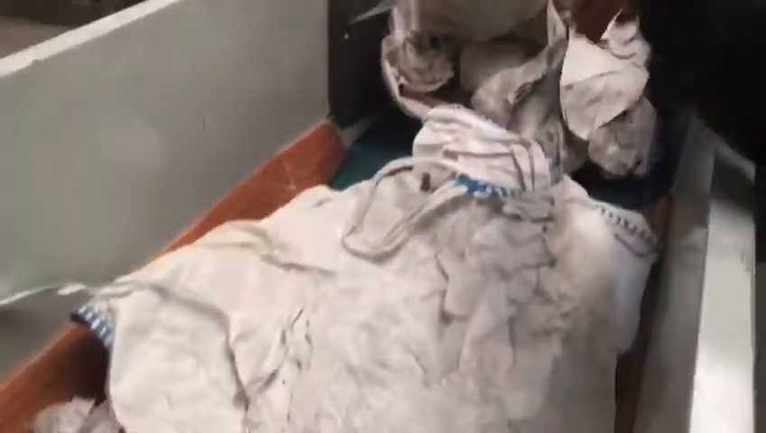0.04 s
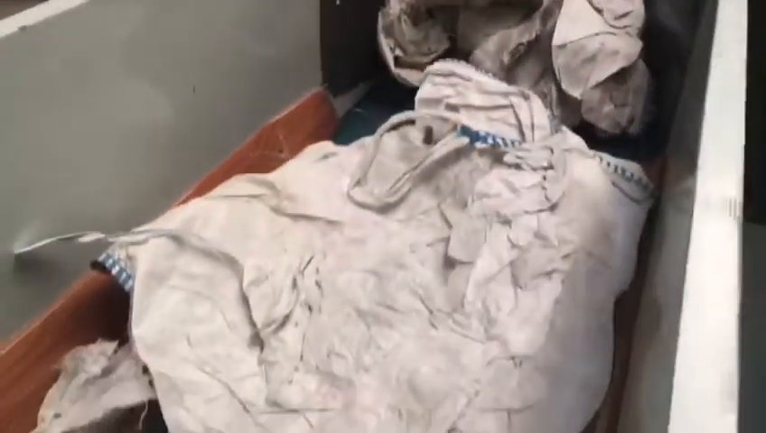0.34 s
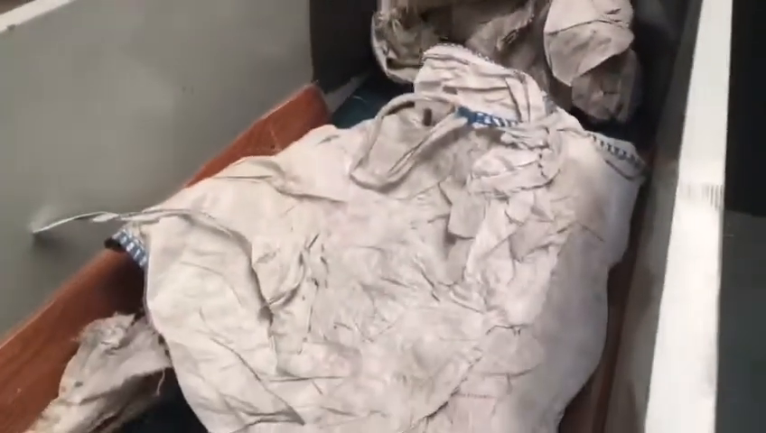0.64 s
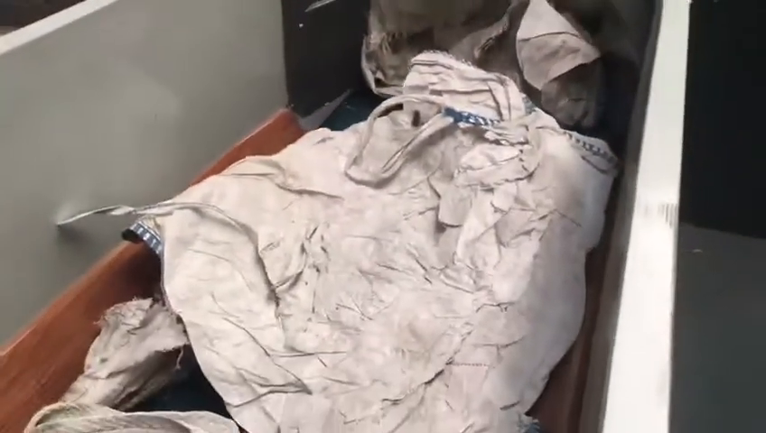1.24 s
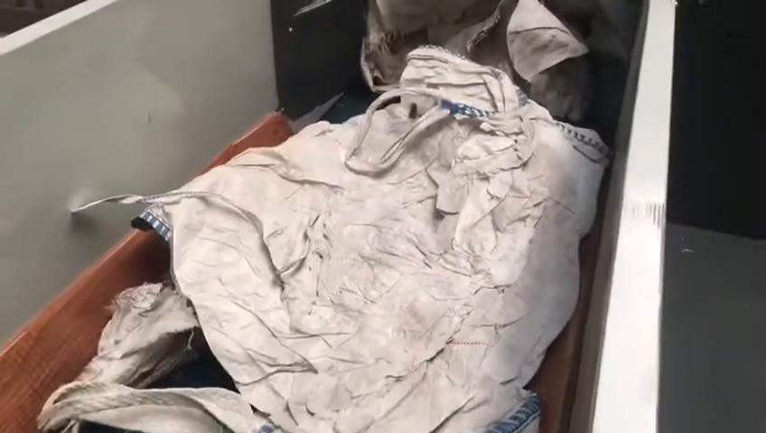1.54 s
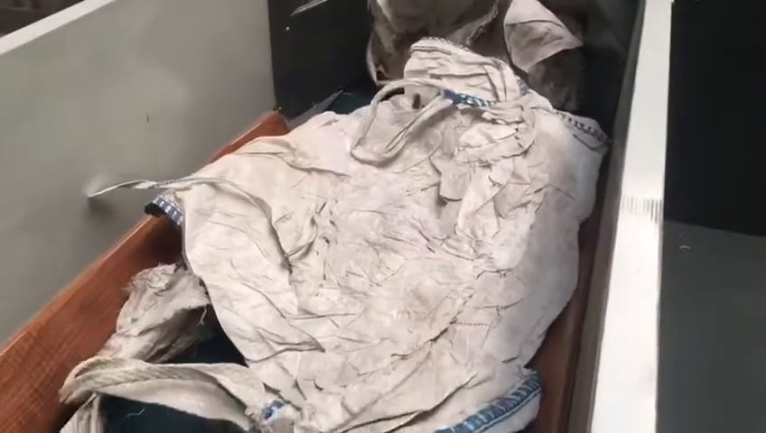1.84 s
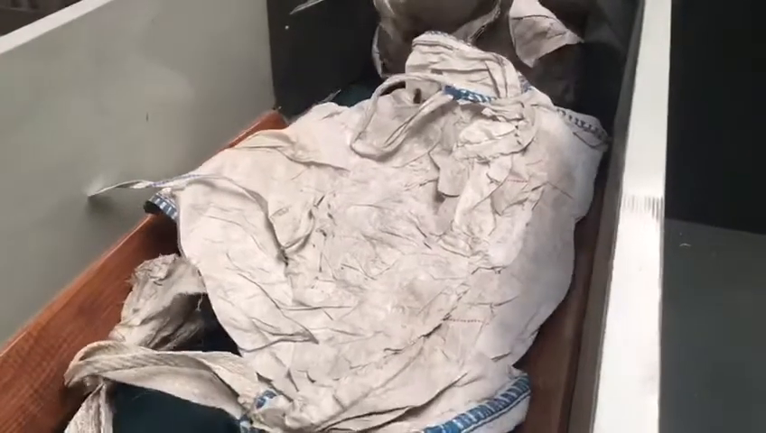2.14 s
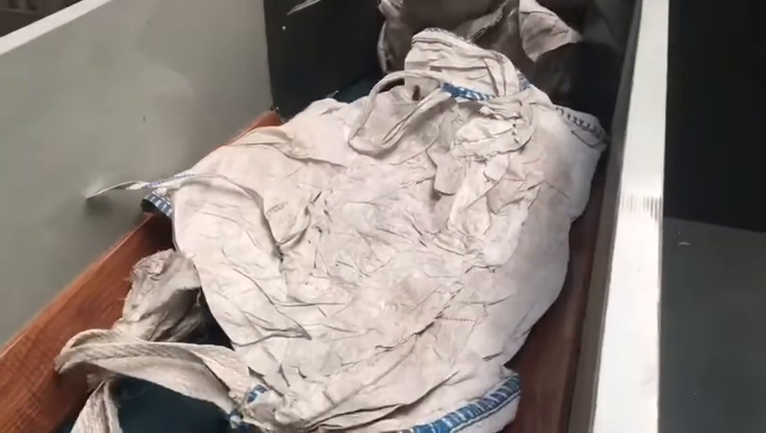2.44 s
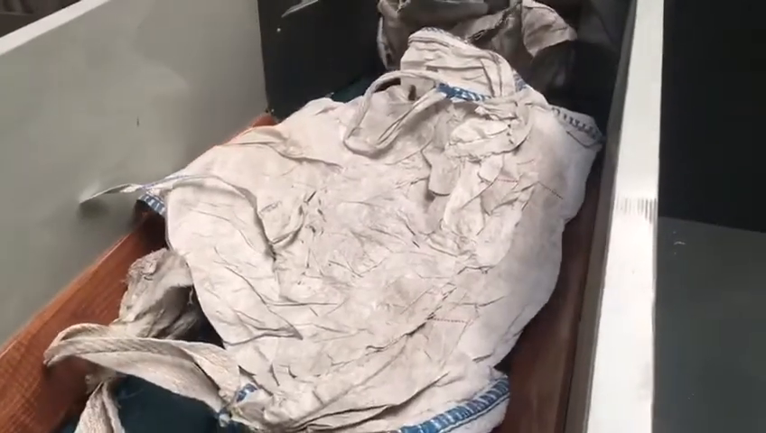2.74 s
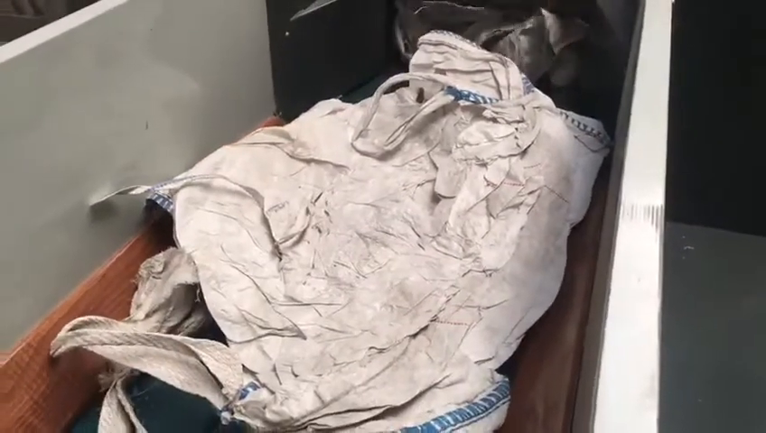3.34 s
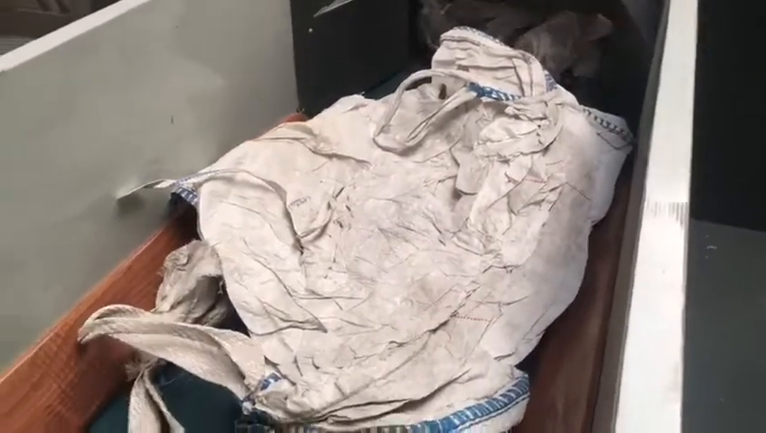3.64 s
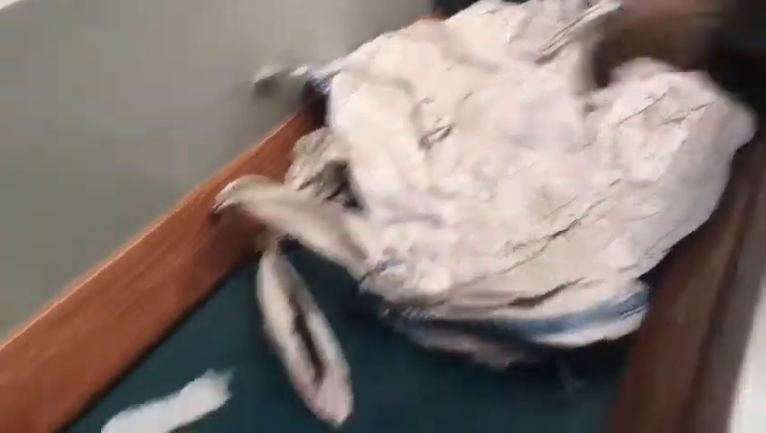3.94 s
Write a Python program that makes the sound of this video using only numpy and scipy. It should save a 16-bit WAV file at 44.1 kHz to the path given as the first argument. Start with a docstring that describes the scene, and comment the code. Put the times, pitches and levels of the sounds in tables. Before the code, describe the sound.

A cutting machine runs close by in a workshop, its motor and conveyor giving a steady low rumble. A blade chops through cloth sacks in quick, even strokes, each a dull thud and short swish, gradually biting harder.

```python
"""Cutting machine in a workshop

A conveyor carries sacks towards the blades while a motor hums over a steady rumble.
About 3.6 times a second a blade passes with a short swish and a dull thud in the housing,
biting harder as the feed goes on. Two small knocks and one sharp click stand out."""
import sys
import numpy as np
from scipy import signal
from scipy.io import wavfile

SR = 44100
rng = np.random.default_rng(int(sys.argv[2]) if len(sys.argv) > 2 else 0)


def materialize(psi):
    """Save the field psi as 16-bit PCM at rate SR to the path in sys.argv[1].

    A 1-D psi becomes a single channel; in a 2-D psi each row is a channel.
    """
    bounded = np.clip(np.atleast_2d(psi).T, -1, 1)
    quanta = np.round(bounded * 32767).astype(np.int16)
    wavfile.write(sys.argv[1], SR, quanta)


N = 176400
TIME = np.arange(N) / SR


def from_db(db):
    """Turn decibels into a number to multiply by."""
    return 10 ** (np.asarray(db) / 20)


def rms_one(x):
    """Scale a sound so that its average strength (rms) is 1."""
    return x / np.sqrt(np.mean(x ** 2) + 1e-20)


def muffle(x, hz, order=2):
    """Turn down the treble above hz; a higher order cuts more steeply."""
    return signal.sosfilt(signal.butter(order, hz, fs=SR, output="sos"), x)


def drift(rate):
    """A smooth random wobble of about 1 either way; a higher rate wobbles faster."""
    r = np.exp(-80 * np.pi * rate / SR)
    slow = signal.lfilter([1], [1, -2 * r, r * r], rng.standard_normal(N // 40 + 2002))[2000:]
    return np.interp(np.arange(N) / 40, np.arange(len(slow)), rms_one(slow))


def wavering_tone(hz, wander_hz, rate):
    """A pure tone of strength 1 whose pitch wanders."""
    return np.sqrt(2) * np.sin(2 * np.pi * np.cumsum(hz + wander_hz * drift(rate)) / SR)


def noise(spectrum, flicker_db=0):
    """Noise of strength 1, built from bands that each have their own level and flicker."""
    hz, db = np.transpose(spectrum)
    edges = 18 * 2 ** (np.arange(30) / 3)   # three bands to the octave
    white, out = rng.standard_normal((2, N + SR // 2)), 0
    for k, (low, high) in enumerate(zip(edges, edges[1:])):
        if high > hz[0] and low < hz[-1]:
            sos = signal.butter(2, [low, high], "band", fs=SR, output="sos")
            band = signal.sosfilt(sos, white[k % 2])[-N:]
            band_db = np.interp(np.log(low * high) / 2, np.log(hz), db)
            out += band * from_db(band_db + flicker_db * drift(16))
    return rms_one(out)


def burst(start, rise, hold, t60):
    """A loudness shape: it rises, holds, then fades by 60 dB in t60. All are in seconds."""
    age = TIME - start
    return np.clip(age / rise, 0, 1) * from_db(-60 * np.clip((age - rise - hold) / t60, 0, 3))


def tone_burst(start, hz, rise, t60):
    """A pure tone that swells and fades."""
    return burst(start, rise, 0, t60) * np.sin(2 * np.pi * hz * (TIME - start))


def taps(times, db):
    """Pushes one sample long, at the given times and levels."""
    out = np.zeros(N)
    np.add.at(out, np.clip((np.asarray(times) * SR).astype(int), 0, N - 1), from_db(db))
    return out


def ring(force, hz, t60):
    """Each tap starts a fading tone as strong as the tap."""
    r, w = from_db(-60 / (t60 * SR)), 2 * np.pi * hz / SR
    return signal.lfilter([0, np.sin(w)], [1, -2 * r * np.cos(w), r * r], force + 1e-18)


# How the motor's hum swells and sinks. Each row: time in seconds, relative level in dB.
HUM_SWELLS = [(0, -22), (.3, -27.5), (.5, -30), (.75, -23.5), (1.0, -23.5), (1.16, -29.5), (1.33, -22.5),
              (1.63, -22.5), (1.87, -26), (2.05, -22.5), (2.36, -20.5), (2.55, -27), (2.72, -25),
              (3.08, -23), (3.28, -28), (3.55, -23), (3.85, -25), (4, -24.5)]
def motor():
    """The motor gives a low, wavering hum and a very faint high whistle."""
    hum_db = np.interp(TIME, *np.transpose(HUM_SWELLS)) - 2.6 + 1.5 * drift(2.3)
    hum = from_db(hum_db) * wavering_tone(hz=100, wander_hz=0.51, rate=2.43)
    whistle = from_db(-88) * wavering_tone(hz=5238, wander_hz=4.1, rate=5.6)
    return hum + whistle


# Pitches at which the drive rings. Each row: pitch in Hz, rough width in Hz, level in dB.
DRIVE_WHINES = [(191.26, 6.6, -37), (494.1, 6.4, -52.5), (952, 8.9, -55.5), (1006, 35, -60),
                (1304, 13, -59), (1694, 80, -65.5), (1836, 39, -67.5), (4040, 220, -80)]
def drive_whine():
    """The drive rings in narrow bands, which turn noise into thin whines."""
    out = 0
    for hz, width, db in DRIVE_WHINES:
        b, a = signal.iirpeak(hz, hz / (2 * width), fs=SR)
        band = signal.lfilter(b, a, rng.standard_normal(N + SR))
        narrower = signal.lfilter(b, a, band)[SR:]
        out += from_db(db) * rms_one(narrower)
    return out


# The rumble from bass to treble. Each row: frequency in Hz, relative level in dB.
RUMBLE_SPECTRUM = [(24, -13.5), (35, -3.5), (48, -1), (62, 4), (76, 4.5), (100, -3), (150, -1), (200, -5),
                   (270, -7.5), (350, -14.5), (450, -19), (600, -20.5), (800, -29), (1050, -26.5),
                   (1450, -38.5), (1750, -42), (2100, -46.5), (3000, -56), (4000, -65.5), (5000, -62),
                   (6300, -70.5), (8000, -77.5), (11000, -71.5), (12500, -87)]
def belt_rumble():
    """The running drive and belt make a deep noise that flickers a little."""
    return from_db(-25.5 - 0.17 * TIME) * noise(RUMBLE_SPECTRUM, flicker_db=1.17)


# The tick of a knock. Each row: frequency in Hz, relative level in dB.
TICK_SPECTRUM = [(250, 15), (350, 25.5), (600, 4.5), (1200, 11), (2000, 3.5), (2800, -1), (3600, -3),
                 (4700, -2), (5600, -18), (6500, -19.5), (10000, -21), (13000, -48)]
# Two small knocks, and a faint, brief rasp just after the start. Each row: start in seconds, tick level
# in dB, tick hold in seconds, thump level in dB, thump pitch in Hz, thump fade time in seconds.
SMALL_KNOCKS = [(.0055, -35.5, 0.0017, -7, 74.3, 0.093), (0.045, -56.5, .02, -35, 111, .05),
                (2.3017, -41, 0.0049, -25.5, 287, 0.07)]
def knocks():
    """Small knocks and rasps: each is a short raspy tick with a low thump under it."""
    rasp, out = noise(TICK_SPECTRUM), 0
    for start, tick_db, hold, thump_db, hz, t60 in SMALL_KNOCKS:
        out += from_db(tick_db) * burst(start, rise=0.0005, hold=hold, t60=0.033) * rasp
        out += from_db(thump_db) * tone_burst(start, hz, rise=0.006, t60=t60)
    return out


# Booms of the frame. Each row: loudest moment in seconds, half length in seconds, level in dB.
FRAME_BOOMS = [(0.146, 0.1, -29), (0.847, 0.1, -22.5), (1.882, 0.23, -31.5), (3.311, 0.093, -22.5),
               (3.944, 0.066, -20.5)]
def frame_booms():
    """Now and then the frame booms: one deep tone swells and sinks."""
    swell = sum(from_db(db) * np.exp(-((TIME - peak) / half) ** 2) for peak, half, db in FRAME_BOOMS)
    return swell * wavering_tone(hz=51.6, wander_hz=6.8, rate=6.5)


# The blade strokes. Each row: start in seconds; relative levels in dB of the swish, bite thud, clack,
# hollow ring, woody knock and release thud; release delay in seconds; relative scrape level in dB.
BLADE_STROKES = [(0.2403, -61, -29, -43, -44.5, -41, -35.5, 0.035, -68.5),
                 (0.5305, -56, -35, -41.5, -38.5, -47, -33, 0.05, -65),
                 (0.809, -58, -21.5, -36, -38, -44.5, -28.5, 0.043, -69.5),
                 (1.0832, -56, -25, -36.5, -36.5, -48.5, -29.5, 0.041, -62.5),
                 (1.356, -56.5, -23.5, -36, -39, -36.5, -26.5, 0.034, -64),
                 (1.6086, -50, -20.5, -35, -34, -39, -26.5, 0.037, -65.5),
                 (1.8808, -50, -25.5, -34, -31, -41, -21, .048, -59.5),
                 (2.16, -52.5, -21.5, -30.5, -39, -31.5, -29.5, .04, -60.5),
                 (2.4336, -52, -30.5, -31, -31.5, -30.5, -27.5, 0.027, -58.5),
                 (2.7119, -48.5, -22, -32.5, -26, -37, -23, .03, -58),
                 (2.988, -49.5, -25, -33, -37, -37, -29, 0.048, -57),
                 (3.2637, -48, -17, -35.5, -43.5, -36, -21.5, .04, -58),
                 (3.5407, -46.5, -21.5, -32.5, -37.5, -31, -19.5, 0.053, -58),
                 (3.8206, -49.5, -17.5, -35.5, -47, -35, -26, 0.039, -58)]
(STARTS, SWISH_DB, BITE_DB, CLACK_DB, HOLLOW_DB, WOODY_DB,
 RELEASE_DB, RELEASE_DELAYS, SCRAPE_DB) = np.transpose(BLADE_STROKES)
BRUSH_LEAD_S = 0.0045   # the edge brushes the cloth just before it bites
def each_stroke(levels_db, rise, hold, t60, lead=0):
    """A loudness shape with one burst for every pass of a blade, begun lead seconds early."""
    return sum(from_db(db) * burst(start - lead, rise, hold, t60) for start, db in zip(STARTS, levels_db))


# The swish through the cloth. Each row: frequency in Hz, relative level in dB.
SWISH_SPECTRUM = [(700, 6), (1100, 14), (1800, -3), (2800, 2.5), (4000, -7.5), (5200, -10), (6600, -9.5),
                  (8500, -15.5), (10500, -23.5), (13000, -41.5)]
def blade_swish():
    """The blade tears through cloth with a grainy swish, then faintly brushes it once more."""
    first = each_stroke(SWISH_DB, rise=0.0071, hold=0.007, t60=0.074, lead=BRUSH_LEAD_S)
    rebound = from_db(-12.5) * np.interp(TIME - 0.042, TIME, first)
    grain = from_db(-0.8 + 0.5 * drift(220))
    return (first + rebound) * grain * noise(SWISH_SPECTRUM)


# The bands of sound in a snapping fibre. Each row: frequency in Hz, relative level in dB.
SNAP_BANDS = [(900, 0), (1250, 0.5), (1900, -6.5), (2800, -11.5), (4200, -19), (6000, -30)]
def fibre_crunch(snaps_per_second=420):
    """Fibres snap as the edge bites, each a tiny puff of uneven size; the sack muffles them."""
    sizes = from_db(2 * np.minimum(rng.exponential(1, N), 3)) * rng.choice([-1, 1], N)
    snaps = sizes * (rng.random(N) < snaps_per_second / SR)
    puffs = sum((-1) ** k * from_db(db) * signal.lfilter(*signal.iirpeak(hz, 2, fs=SR), snaps + 1e-18)
                for k, (hz, db) in enumerate(SNAP_BANDS))
    loudness = each_stroke(SWISH_DB + 1, rise=0.0071, hold=0.007, t60=0.081, lead=BRUSH_LEAD_S)
    return loudness * muffle(rms_one(puffs), hz=4500)


# The blade's scrape. Each row: frequency in Hz, relative level in dB.
SCRAPE_SPECTRUM = [(1600, -2.5), (2600, 4.5), (4000, -1.5), (5200, -10), (7500, -13.5), (10000, -26.5)]
def blade_scrape():
    """The blade scrapes on along the cut edge with a rough hiss."""
    loudness = each_stroke(SCRAPE_DB, rise=0.031, hold=0, t60=0.32)
    grain = from_db(-5.5 + 2 * drift(120))
    return loudness * grain * noise(SCRAPE_SPECTRUM)


# The clack of the carrier, which holds the blade. Each row: frequency in Hz, relative level in dB.
CLACK_SPECTRUM = [(200, -16), (300, 3.5), (370, 9.5), (480, -3), (620, -1), (790, -5.5), (1000, -19),
                  (1500, -21), (2500, -37.5)]
def carrier_clack():
    """The carrier clacks at each stroke with a burst of noise, and the housing gives a hollow ring."""
    clack = each_stroke(CLACK_DB - 2, rise=0.0033, hold=0.031, t60=0.1) * noise(CLACK_SPECTRUM)
    hollow = sum(from_db(db + 0.5) * tone_burst(start, hz=377.8, rise=0.032, t60=0.14)
                 for start, db in zip(STARTS, HOLLOW_DB))
    return clack + hollow


# The carrier's woody tones. Each row: pitch in Hz, relative level in dB, fade time in seconds.
CARRIER_TONES = [(491.6, -4.5, .11), (608, 3.5, 0.062), (727, -5.5, 0.052), (767, -0.5, 0.1),
                 (970, -12, 0.093), (1164, -14.5, 0.067)]
def carrier_knock(delay_s=0.00595, spread_s=0.008):
    """Each chop knocks the carrier, which rings briefly like wood."""
    out = 0
    for k, (hz, db, t60) in enumerate(CARRIER_TONES):
        times = STARTS + delay_s + spread_s * (rng.random(len(STARTS)) - 0.5)
        out += (-1) ** k * ring(taps(times, WOODY_DB + db), hz, t60)   # every other tone is flipped
    return from_db(-2) * muffle(out, hz=1400)


# The housing's low tones; those that fade fast make the punch.
# Each row: pitch in Hz, relative level in dB, fade time in seconds.
HOUSING_TONES = [(118.3, -7, 0.54), (139.5, 2, 0.12), (163.5, -0.5, 0.14), (190.1, -1, 0.25),
                 (211.4, 3, .07), (245.4, -4.5, 0.18), (282, -4, 0.1)]
def housing_thud(bite_delay_s=0.00898, settle_s=0.043, spread_s=0.0059):
    """Each cut shakes the housing three times: the blade bites, it lets go, the housing drops back."""
    releases = STARTS + RELEASE_DELAYS
    push_times = np.column_stack([STARTS + bite_delay_s, releases, releases + settle_s]).ravel()
    push_db = np.column_stack([BITE_DB, RELEASE_DB, RELEASE_DB - 6]).ravel()
    out = 0
    for k, (hz, db, t60) in enumerate(HOUSING_TONES):
        times = push_times + spread_s * (rng.random(len(push_times)) - 0.5)
        levels = push_db + db + 1.57 * rng.standard_normal(len(push_times))
        out += (-1) ** k * ring(taps(times, levels), hz, t60)
    return muffle(out, hz=360, order=4)


def workshop_echo(x, t60=0.89):
    """Sound bounces between the walls: ten echoes repeat, weaker each time."""
    out = np.zeros(N)
    for k, lag in enumerate((rng.uniform(0.02, 0.06, 10) * SR).astype(int)):
        loop, gain = x.copy(), from_db(-60 * lag / SR / t60)
        for i in range(lag, N, lag):
            loop[i:i + lag] += gain * loop[i - lag:i][:N - i]
        out += (loop - x) * (-1) ** k
    return out / np.sqrt(10)


def click(start_s=1.4233, fall_s=0.0015):
    """One dry click: a sudden step that falls back."""
    step = taps([start_s], db=[-18])
    return signal.lfilter([1], [1, -np.exp(-1 / (fall_s * SR))], step + 1e-18)


def scene():
    """The machine close by, with a little workshop echo on the cuts; everything but the click is cut off above
    about 12 kHz."""
    cuts = blade_swish() + fibre_crunch() + blade_scrape()
    cuts += carrier_clack() + carrier_knock() + housing_thud()
    running = motor() + drive_whine() + belt_rumble() + frame_booms()
    machine = running + cuts + from_db(-11) * workshop_echo(cuts) + knocks()
    return (muffle(machine, hz=11800, order=10) + click())[None]


def record(dry):
    """The microphone loses the deepest bass; the ends fade quickly and the highest treble is cut."""
    heard = signal.sosfilt(signal.butter(2, 21.5, "high", fs=SR, output="sos"), dry)
    fade = np.clip(np.minimum(TIME, TIME[::-1]) / 0.003, 0, 1)
    return signal.sosfilt(signal.ellip(10, 0.1, 80, 16600, fs=SR, output="sos"), heard * fade)


dry = scene()
out = record(dry)
materialize(out)
```